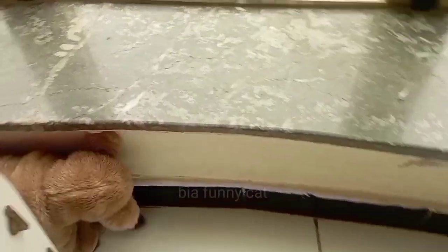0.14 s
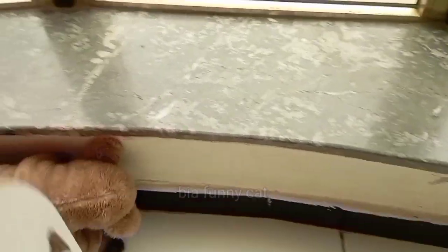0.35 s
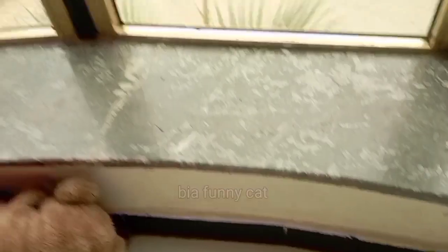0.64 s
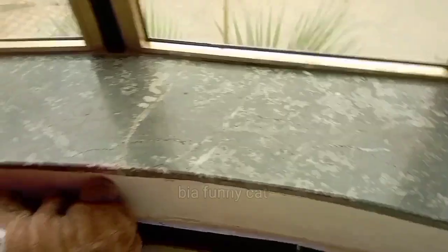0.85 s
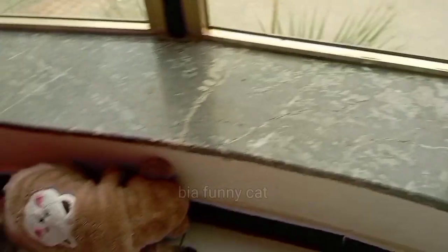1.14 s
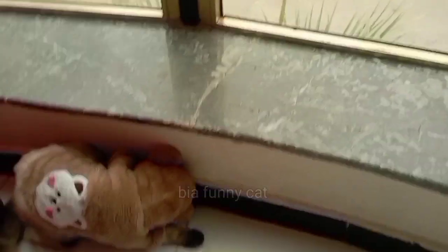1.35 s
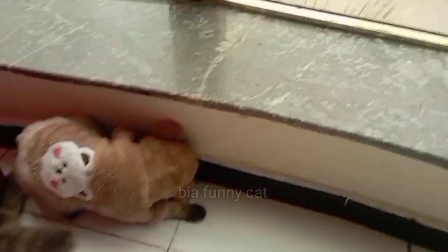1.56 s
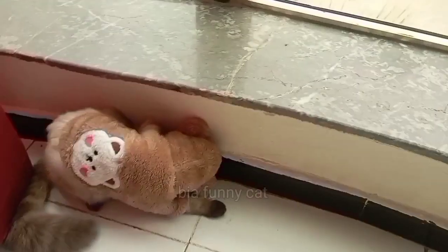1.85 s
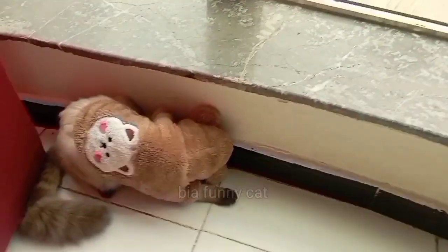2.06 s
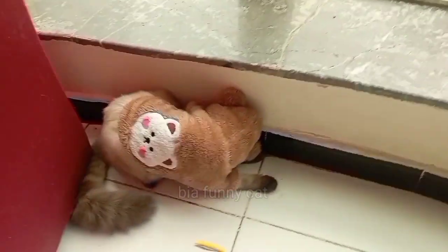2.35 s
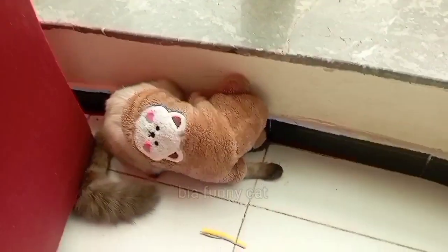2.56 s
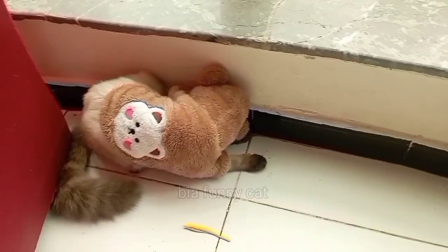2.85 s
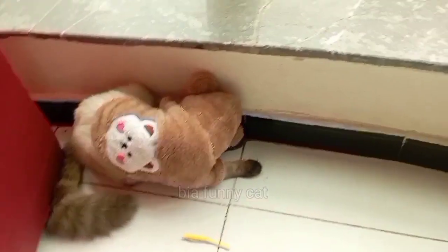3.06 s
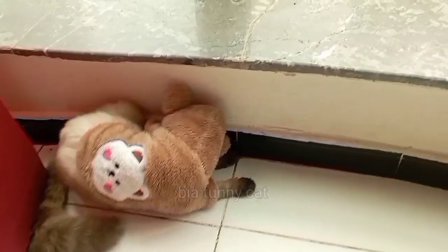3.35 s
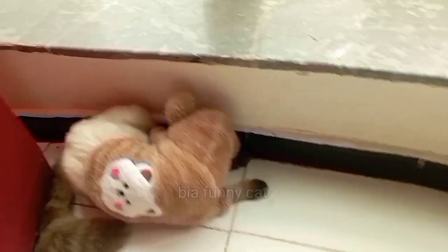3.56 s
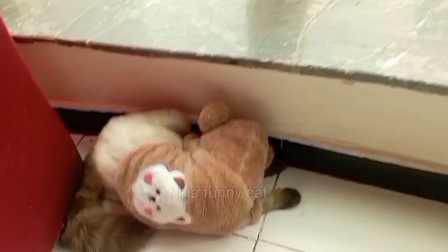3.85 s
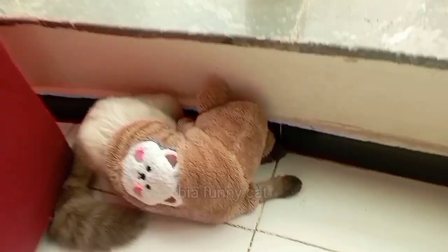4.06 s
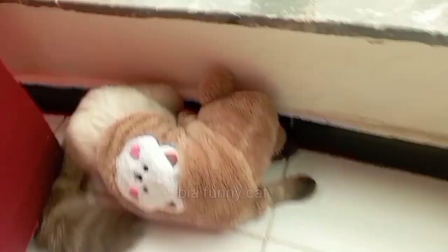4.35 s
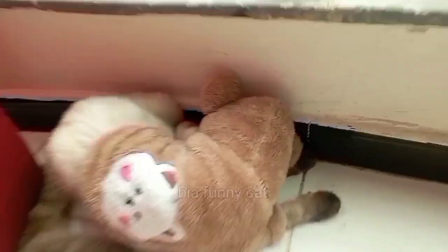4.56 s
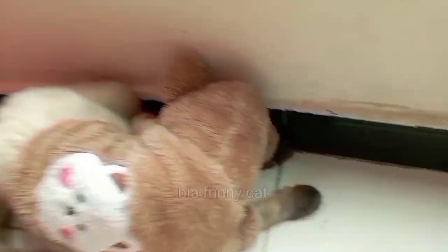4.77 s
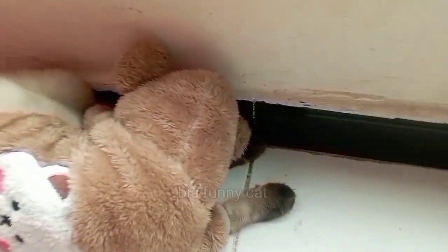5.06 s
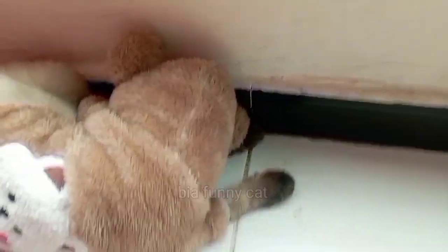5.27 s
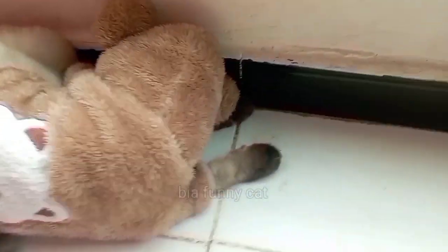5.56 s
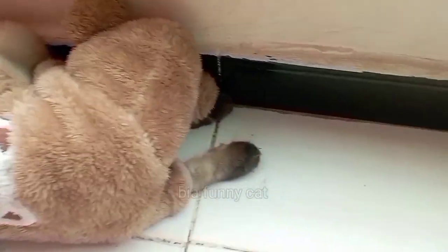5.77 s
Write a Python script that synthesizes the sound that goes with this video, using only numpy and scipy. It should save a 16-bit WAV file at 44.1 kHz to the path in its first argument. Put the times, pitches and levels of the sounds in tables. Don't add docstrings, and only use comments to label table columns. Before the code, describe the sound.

Close, uneven pawing on hollow board and hard tile: dull thuds, dry scrapes, quick swishes of fur and a cluster of bright claw clacks before two seconds. Heavier blows land towards three seconds, then the animal quiets. Low, airy bumps from a finger shifting on the phone dominate the right channel later, over faint rustle, light flicks and a short indoor reverberation.

```python
import sys
import numpy as np
from scipy import signal
from scipy.io import wavfile
from scipy.ndimage import uniform_filter1d

SR = 44100
rng = np.random.default_rng(int(sys.argv[2]) if len(sys.argv) > 2 else 0)


def volts_from_db(level):
    exponent = np.asarray(level, float) / 20
    return 10 ** exponent


def digitize_waveform(pressure):
    field = np.atleast_2d(pressure).T
    bounded = np.clip(field, -1, 1)
    quanta = np.round(bounded * 32767).astype(np.int16)
    wavfile.write(sys.argv[1], SR, quanta)


N = 261072

# centre_hz, width_hz, level_db
SKIRTING_MODES = [(195, 60, -3), (255, 50, 0), (335, 70, -2), (430, 100, -6), (570, 170, -9),
                  (800, 400, -19)]


def band(x, hz, width):
    return signal.lfilter(*signal.iirpeak(hz, hz / width, fs=SR), x)


def body(x, modes):
    total = 0
    for k, (hz, width, db) in enumerate(modes):
        mode = band(band(x, hz, 1.4 * width), hz, 1.4 * width)
        total = total + (-1) ** k * volts_from_db(db) * mode
    return total


def cut(x, hz, kind, order):
    return signal.sosfilt(signal.butter(order, hz, kind, fs=SR, output="sos"), x)


def unit(x):
    return x / np.sqrt(np.mean(x ** 2))


def grainy(rate, scatter_db, tail_s):
    slips = (rng.random(N) < rate / SR) * volts_from_db(scatter_db * rng.exponential(size=N))
    decay = np.exp(-1 / (tail_s * SR))
    level = signal.lfilter([1], [1, -decay], slips + rate / SR)
    return unit(rng.standard_normal(N) * level)


def strike(times, gains, shapes):
    length = shapes.shape[-1]
    out = np.zeros(N + length)
    for s, gain, shape in zip(times, gains, np.broadcast_to(shapes, (len(times), length))):
        start = int(s * SR)
        out[start:start + length] += gain * shape / np.abs(shape).max()
    return out[:N]


def bursts(decay_s, modes, own_hz, sharpness):
    t = np.arange(8192) / SR
    force = np.exp(-t / decay_s) + 1.7 * np.exp(-6.0 * t / decay_s)
    push = rng.standard_normal((len(own_hz), len(t))) * force
    spot = [body(p, [(hz, hz / sharpness, 0)]) for p, hz in zip(push, own_hz)]
    return body(push, modes) + np.array(spot)


def effort():
    # start_s, length_s, paw_weight_db, fur_speed_db
    drags = [(0.0, 1.94, -57, -66.5), (0.0, .14, -52, -62.5), (0.34, 0.19, -60.5, -64),
             (0.491, 0.15, -45, -60.5), (.65, 0.14, -52, -85), (0.839, .24, -46, -67),
             (1.062, .13, -50.5, -68), (2.964, 0.079, -49, -65.5), (1.166, 0.14, -39.5, -62),
             (1.5, 0.23, -45, -61.5), (1.728, 0.23, -59, -61), (2.419, .9, -62, -74.5),
             (3.192, 2.17, -72, -72.5), (3.32, 0.21, -61.5, -78), (3.61, .1, -77, -64),
             (4.048, 0.18, -73.5, -69.5), (4.585, 0.33, -71, -73), (4.905, 0.084, -78, -68.5),
             (5.153, .14, -73, -76), (5.444, 0.13, -86, -64), (5.618, 0.29, -72, -80.5)]
    # start_s, paw_weight_db, fur_speed_db
    swipes = [
        (1.24, -41.5, -69),
        (1.52, -53, -51.5),
        (1.741, -52.5, -53.5),
        (1.93, -63.5, -65),
        (2.501, -40.5, -59),
        (2.737, -38.5, -58.5),
        (2.971, -37, -59),
    ]
    edge_s, still_paw_db, still_fur_db = 0.02, -76, -95
    paw_fade_db_s, fur_fade_db_s = 64.5, 137
    scrape_paw_share, scrape_db = 0.22, -5
    t = np.arange(N) / SR
    paw_power = volts_from_db(still_paw_db) ** 2 + 0 * t
    fur_power = volts_from_db(still_fur_db) ** 2 + 0 * t
    for s, length, paw_db, fur_db in drags:
        held = np.clip(np.minimum(t - s, s + length - t) / edge_s + 0.5, 0, 1) ** 2
        paw_power += held * volts_from_db(paw_db) ** 2
        fur_power += held * volts_from_db(fur_db) ** 2
    for s, paw_db, fur_db in swipes:
        since = np.maximum(t - s, 0)
        paw_power += (t > s) * volts_from_db(paw_db - paw_fade_db_s * since) ** 2
        fur_power += (t > s) * volts_from_db(fur_db - fur_fade_db_s * since) ** 2
    paw, fur = np.sqrt(paw_power), np.sqrt(fur_power)
    scrape = volts_from_db(scrape_db) * paw ** scrape_paw_share * fur ** (1 - scrape_paw_share)
    return paw, scrape, fur


def rustle(rumble, scrape, hiss):
    # centre_hz, width_hz, level_db
    scrape_modes = [(1059, 120, -11.5), (1500, 1500, 15), (800, 120, -10.5), (2300, 1940, 10.5),
                    (3740, 2040, -3)]
    # centre_hz, width_hz, level_db
    fur_modes = [(4360, 2470, -5.5), (7700, 3400, -10.5), (9870, 1500, -1), (13000, 4100, -7)]
    low = rumble * unit(body(grainy(60, 2.4, 0.014), SKIRTING_MODES))
    middle = scrape * unit(body(grainy(80, 3.2, 0.008), scrape_modes))
    high = hiss * unit(body(grainy(76, 3.1, 0.018), fur_modes))
    return low, middle + high


def floor_slab(rumble):
    deep = unit(cut(cut(grainy(60, 1.5, 0.02), 90, "high", order=2), 170, "low", order=2))
    weight = unit(cut(cut(grainy(45, 2.1, 0.065), 43, "high", order=2), 100, "low", order=2))
    return volts_from_db(-58) * deep + volts_from_db(-6) * uniform_filter1d(rumble, size=4000) * weight


def spread(x, hz, count):
    tangent = np.tan(np.pi * hz / SR)
    a = (1 - tangent) / (1 + tangent)
    for _ in range(count):
        x = signal.lfilter([-a, 1], [1, -a], x)
    return x


def hand():
    # time_s, pressure_db
    grip = [(0.0, -47.5), (.4, -55.5), (.5, -54.5), (.9, -48), (1.25, -50), (1.45, -56), (1.9, -49.5),
            (2.15, -58), (2.5, -47), (2.8, -50.5), (3.1, -56), (3.4, -47), (3.6, -54), (4.2, -54.5),
            (4.55, -50.5), (4.9, -55), (5.4, -55.5), (5.92, -55)]
    # start_s, thump_db, tick_over_thump_db (quickness), case_knock_over_thump_db
    slip_events = [(.0091, -45.5, -7.5, -2), (0.3167, -31, -30, -20.5), (4.1285, -50, -3, -13),
                   (1.136, -39.5, -13, 0.5), (1.2162, -34.5, -16, -14), (1.5142, -38.5, -11, -12),
                   (1.715, -37.5, -22, -23.5), (2.4383, -34.5, -26, -5), (2.5912, -28.5, -18, -18),
                   (2.6034, -18.5, -24.5, -10), (3.3222, -38.5, -20, -10), (3.37, -38.5, -20, -12),
                   (3.3895, -15.5, -30.5, -12.5), (3.429, -30.5, -21, -8), (3.4466, -24, -31, -16),
                   (3.4842, -41.5, -14, -14), (3.845, -38.5, -20, -12), (4.0232, -41.5, -7, -14),
                   (4.0297, -39, -31, -15), (4.0803, -39, -12, -22), (4.1769, -46, -3, -5),
                   (4.234, -34, -19, -8.5), (4.244, -52, -6, -10.5), (4.2585, -7.5, -13.5, -13),
                   (4.3083, -18.5, -31, -19.5), (4.5024, -36.5, -27.5, -12.5), (4.5769, -26, -26.5, -14.5),
                   (4.6561, -11.5, -17, -18.5), (5.6665, -40.5, -17, -18), (5.7059, -37.5, -24, -6)]
    # start_s, thump_db
    nudges = [(.2769, -38), (0.374, -42), (0.5352, -41), (0.5524, -33.5), (0.8398, -35.5), (1.03, -39),
              (1.425, -40), (1.456, -39), (1.9506, -42.5), (2.0134, -42.5), (2.235, -44), (2.2644, -43),
              (2.4043, -42), (2.5773, -35), (2.7915, -41), (3.6, -41.5), (3.6372, -42.5), (3.7577, -37.5),
              (3.888, -41), (3.9668, -41), (4.1452, -42), (4.284, -33.5), (4.405, -45), (4.43, -44),
              (4.4952, -34.5), (4.8454, -39.5), (4.8803, -36.5), (5.0855, -42.5), (5.1222, -42.5),
              (5.4023, -55)]
    # centre_hz, width_hz, level_db
    case_modes = [(350, 114, 10), (550, 215, -1.5), (797, 378, -14.5)]
    nudge_tick_db, nudge_case_db = -29, -21.5
    jolt = spread(cut(np.ones(4096), 93.8, "high", order=6), 900, count=2)
    ramp = -np.cumsum(jolt)
    thump = ramp + 0.2 * band(ramp, 116, 41.4)
    rows = slip_events + [row + (nudge_tick_db, nudge_case_db) for row in nudges]
    s, thump_db, quick_db, knock_db = np.transpose(rows)
    tick_db, case_db = thump_db + quick_db, thump_db + knock_db

    edge = cut(jolt, 600, "high", order=2)
    tick_top_hz = 2300 * volts_from_db(0.22 * (tick_db + 19.0))
    ticks = np.array([cut(edge, hz, "low", order=6) for hz in tick_top_hz])
    softness_db = np.clip(quick_db, -32, -14)
    thump_top_hz = 650 * volts_from_db(0.33 * (softness_db + 8.5))
    thumps = np.array([cut(thump, hz, "low", order=2) for hz in thump_top_hz])
    slips = strike(s - 0.0012, volts_from_db(thump_db + 2.0), thumps)
    slips += strike(s - 0.0008, volts_from_db(tick_db + 4.0), ticks)
    slips += strike(s - 0.001, volts_from_db(case_db + 4.0), bursts(0.0033, case_modes, 0 * s + 400, 2.87))

    creep = (rng.random(N) < 230 / SR) * rng.standard_normal(N) * volts_from_db(1.45 * rng.exponential(size=N))
    creep = unit(cut(signal.fftconvolve(creep, thump)[:N], 260, "low", order=2))
    sway = unit(cut(cut(rng.standard_normal(N), 60, "low", order=2), 42, "high", order=4))
    grip_s, grip_db = np.transpose(grip)
    pressure = volts_from_db(np.interp(np.arange(N) / SR, grip_s, grip_db))
    case_rub = volts_from_db(-73) * unit(body(grainy(49, 1.17, 0.009), case_modes))
    return slips + pressure * (creep + volts_from_db(-3.0) * sway) + case_rub


def knocks():
    # start_s, level_db, board_pitch_hz
    blows = [(0.039, -49, 330), (0.089, -51, 310), (0.152, -40.5, 432), (0.369, -46.5, 410),
             (0.493, -39.5, 533), (0.548, -35.5, 214), (0.741, -32.5, 195), (0.927, -44, 170),
             (0.994, -33, 228), (1.033, -34.5, 228), (1.242, -28.5, 315), (1.519, -37, 214),
             (1.56, -28, 420), (1.711, -44, 614), (1.812, -44.5, 302), (2.205, -56, 216.4),
             (2.498, -29, 311), (2.738, -23.5, 197), (2.783, -29.5, 167), (2.966, -20, 236),
             (3.015, -43, 210), (3.138, -36.5, 270), (1.187, -35.5, 250), (3.225, -37.5, 443),
             (3.623, -53, 415), (3.658, -40, 423), (4.759, -52, 530), (4.825, -47.5, 220)]
    # centre_hz, width_hz, level_db
    pad_modes = [(614, 300, 0), (1100, 640, -5.5)]
    s, db, hz = np.transpose(blows)
    board_modes = [(f, width, board_db - 9) for f, width, board_db in SKIRTING_MODES]
    slap = strike(s, volts_from_db(db - 11), bursts(0.006, pad_modes, 2.4 * hz, 2.5))
    board = strike(s, volts_from_db(db + 2.0), bursts(0.023, board_modes, hz, 2.94))
    return board + slap


def claws():
    # start_s, tip_db, dull_over_tip_db, spot_ring_hz
    taps = [(.0851, -56, 13, 890), (0.1007, -52.5, 4, 900), (0.349, -47.5, -6, 1530),
            (.6134, -63, 14.5, 910), (.7412, -60, 4.5, 900), (0.876, -51, 8.5, 1220),
            (0.9219, -58, 18, 870), (0.934, -66, 23, 1340), (.992, -55.5, 12.5, 1780),
            (1.2483, -46.5, 2, 1500), (1.5622, -57.5, 23.5, 1010), (1.7133, -49.5, 10.5, 990),
            (1.7533, -47, 4, 1103), (2.4954, -51, 9, 885), (2.5054, -52.5, 15.5, 1310),
            (2.705, -70, 12, 1300), (2.7347, -51, 13.5, 1230), (2.79, -65.5, 16, 1500),
            (3.1394, -61, 18, 1090), (3.655, -61, 13, 890), (4.5886, -69, 17.5, 2000),
            (4.597, -68.5, 19, 1100), (4.6112, -70, 18.5, 1440), (4.625, -73, 15, 1900),
            (4.665, -66, 14, 3200), (2.9772, -40, 0.5, 903), (4.7047, -62.5, 14, 3300),
            (4.762, -60, 18, 2420), (4.9456, -58.5, 16.5, 2000), (4.952, -63, 16, 2830)]
    # start_s, tip_db, dull_over_tip_db
    flicks = [(0.0436, -71, 16), (0.3684, -46.5, -10), (.5845, -47, -31), (0.6316, -45.5, -14),
              (0.817, -52, -20), (.839, -48, -32), (3.2245, -59, 2), (3.3647, -64, -14),
              (3.4154, -59.5, -4), (3.4793, -57, -19), (4.171, -70.5, 18), (4.719, -69.5, -12),
              (4.831, -60.5, 3.5), (5.121, -63, -3), (5.24, -55.5, -12), (5.285, -60, -15),
              (5.358, -58, -9), (5.4955, -48.5, -26), (5.527, -49, -38), (5.548, -56, -26),
              (5.5906, -55.5, -21), (5.7383, -63, -16), (5.7882, -59.5, -11), (5.8146, -58, -15),
              (5.8738, -62.5, -12)]
    # start_s, tip_db, shaft_over_tip_db, dull_over_tip_db, tip_ring_hz
    clacks = [
        (0.4967, -26, -19, -16.5, 10530),
        (0.5422, -36, -32, -18, 10400),
        (1.5207, -25, -9, -14.5, 10170),
        (1.6233, -49, 12, 9.5, 9800),
        (1.7225, -42, 1.5, -4, 9550),
        (1.7418, -18, -8, -14, 8150),
        (1.7436, -20, -10, -30.5, 10700),
        (1.8144, -29, -6.5, -8, 10200),
        (1.8777, -35.5, -12, -11.5, 9900),
        (1.931, -58, -3, 8, 9000),
    ]
    # centre_hz, width_hz, level_db
    bright_modes = [(7400, 1100, 0), (8600, 1500, -4), (10400, 1800, -4), (13500, 3500, -11)]
    # centre_hz, width_hz, level_db
    middle_modes = [(2940, 334, 1), (3660, 400, 3.5), (4170, 1130, -4.5)]
    # centre_hz, width_hz, level_db
    low_modes = [(1073, 54, -9.5), (2000, 1400, -16), (710, 1100, -8.5)]
    soft_tip_hz, flick_hz, clack_hz = 10970, 1420, 1300
    middle_share, middle_db = 0.35, -6
    gap_hz, gap_width_hz, gap_db = 1062, 30, -4
    soft = [(s, db, middle_share * dull + middle_db, dull, soft_tip_hz, hz)
            for s, db, dull, hz in taps + [row + (flick_hz,) for row in flicks]]
    rows = [row + (clack_hz,) for row in clacks] + soft
    s, tip_db, shaft_db, dull_db, tip_hz, low_hz = np.transpose(rows)
    bright = strike(s, volts_from_db(tip_db + 8.5), bursts(0.003, bright_modes, tip_hz, 5.3))
    middle = strike(s, volts_from_db(tip_db + shaft_db + 5), bursts(0.0057, middle_modes, 0 * s + 3700, 11.3))
    dull = strike(s, volts_from_db(tip_db + dull_db), bursts(0.012, low_modes, low_hz, 4.5))
    click = np.exp(-np.arange(8192) / 4.5)
    note = band(band(click, gap_hz, gap_width_hz), gap_hz, 400)
    hard = slice(len(clacks))
    gap = strike(s[hard], volts_from_db(tip_db + dull_db + gap_db)[hard], note)
    return bright + middle, dull + gap


def room(x, t60_s):
    t = np.arange(int(0.6 * SR)) / SR
    tail = rng.standard_normal((2, len(t))) * 10 ** (-3 * t / t60_s) * np.minimum(t / 0.006, 1)
    return signal.fftconvolve(x[None], tail / np.sqrt(np.sum(tail[0] ** 2)))[:, :N]


def scene():
    levels = effort()
    drag_low, high = rustle(*levels)
    low = drag_low + knocks()
    sharp, dull = claws()
    ticks = sharp + dull
    wet = volts_from_db(-14.5) * room(ticks, 0.36) + volts_from_db(-9.5) * room(low, 0.44)
    muffled = volts_from_db(-11.5) * cut(np.roll(low, 22), 260, "low", order=1)
    muffled += volts_from_db(-32.0) * cut(sharp, 3000, "low", order=1)
    muffled += volts_from_db(-17.5) * np.roll(dull, 22)
    far_high = volts_from_db(-9) * cut(rustle(*levels)[1], 1800, "high", order=1)
    far_wet = volts_from_db(-6.0) * cut(wet[1], 4000, "low", order=1)
    own_noise = volts_from_db(-76.0) * unit(cut(rng.standard_normal((2, N)), 5000, "low", order=1))
    left = low + high + ticks + wet[0] + floor_slab(levels[0])
    right = muffled + far_high + far_wet + hand()
    return np.array([left, right]) + own_noise


def top_cut(x):
    return signal.sosfilt(signal.butter(12, 16470, fs=SR, output="sos"), x)


def record(dry):
    top = signal.ellip(8, 0.3, 50, 15700, fs=SR, output="sos")
    mix = signal.sosfilt(top, dry)
    return top_cut(mix)


dry = scene()
out = record(dry)
digitize_waveform(out)
```